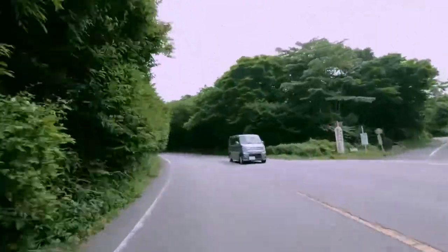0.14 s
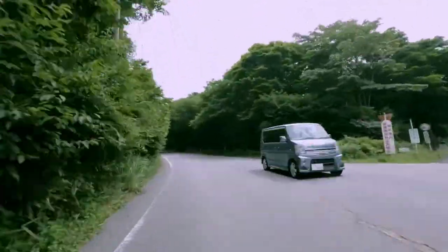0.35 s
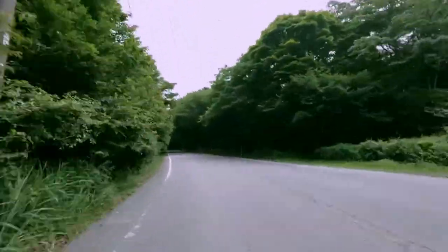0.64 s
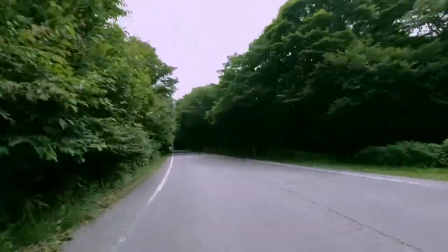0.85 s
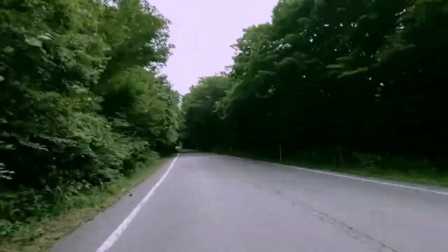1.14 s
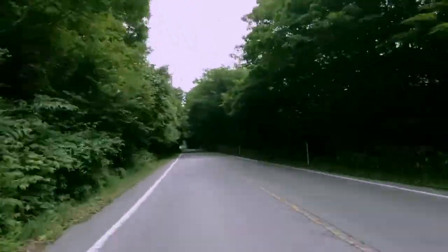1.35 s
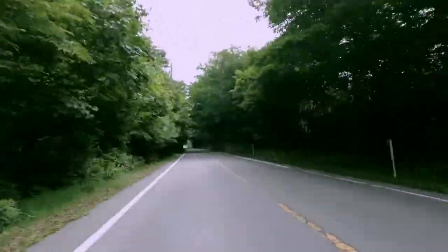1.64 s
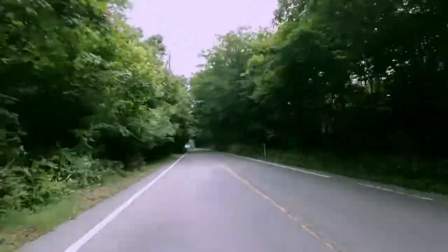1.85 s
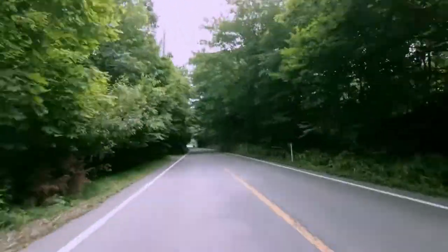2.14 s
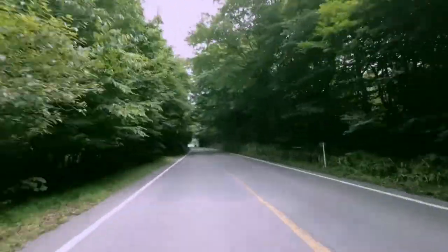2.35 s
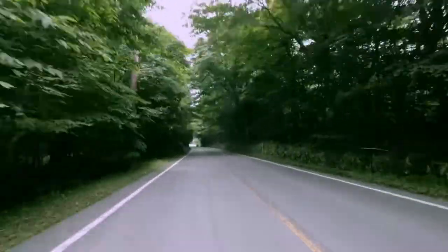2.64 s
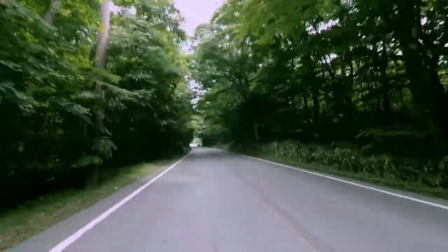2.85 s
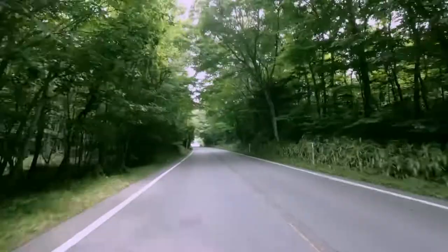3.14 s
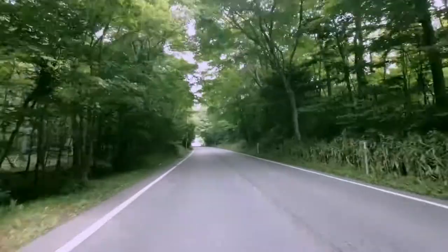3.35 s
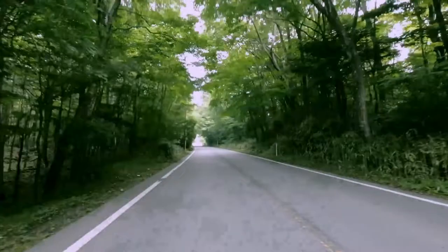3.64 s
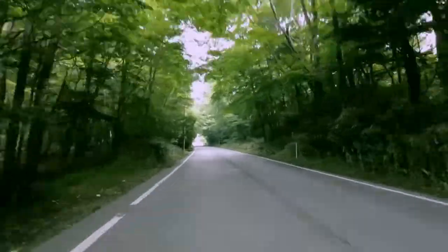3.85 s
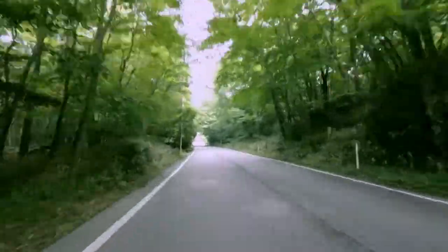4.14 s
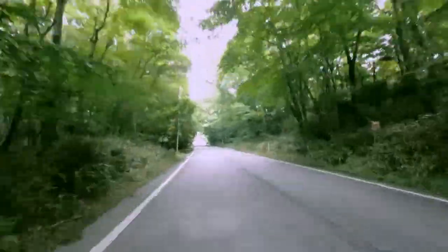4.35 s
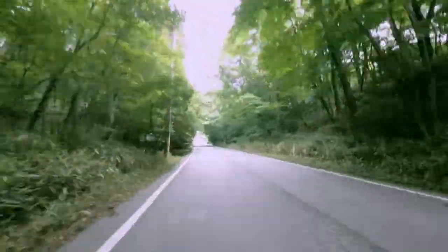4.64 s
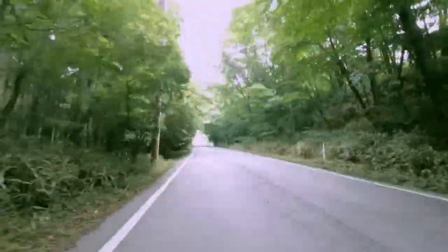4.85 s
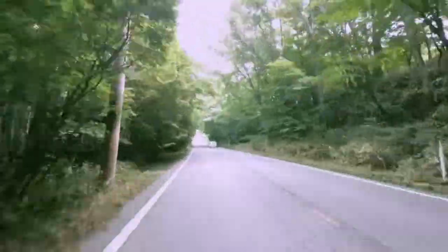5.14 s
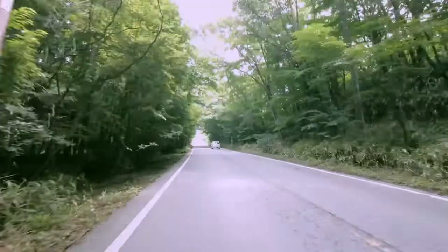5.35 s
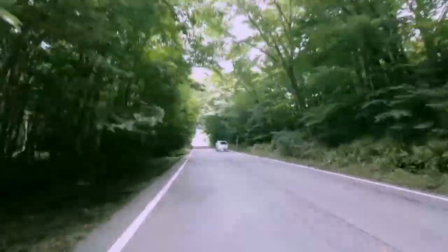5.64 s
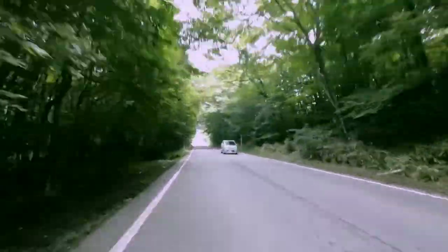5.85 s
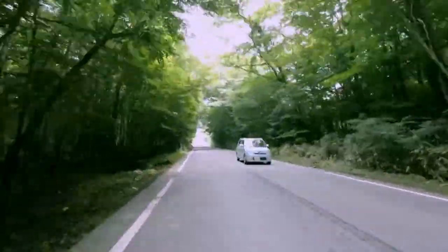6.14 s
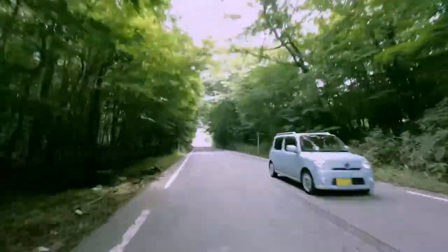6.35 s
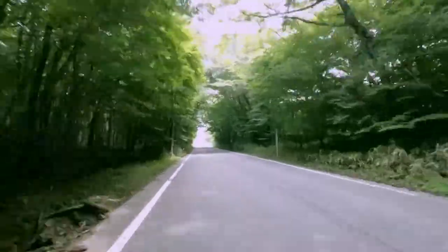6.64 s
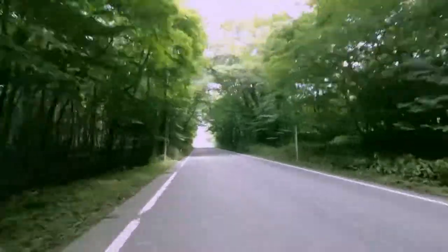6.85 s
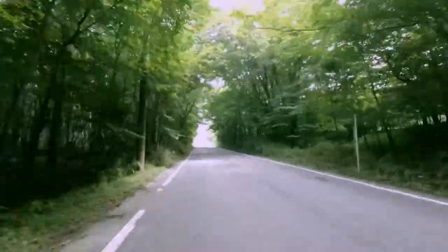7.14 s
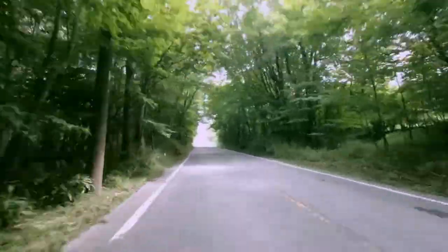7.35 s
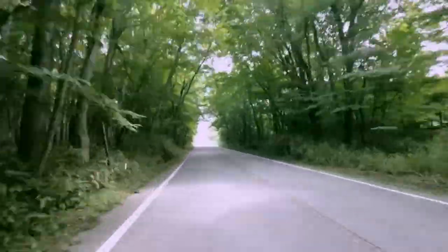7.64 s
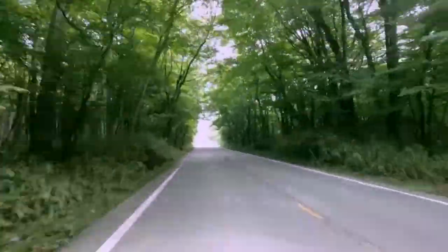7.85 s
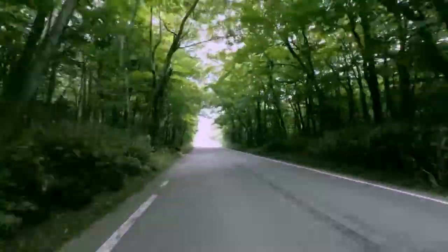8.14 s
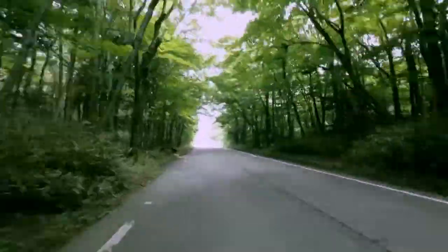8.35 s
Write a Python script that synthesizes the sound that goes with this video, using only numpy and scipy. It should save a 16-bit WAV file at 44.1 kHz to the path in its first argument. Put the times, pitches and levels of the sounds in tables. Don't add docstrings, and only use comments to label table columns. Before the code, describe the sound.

A twin-cylinder motorcycle engine throbs low and unevenly, rising slowly in pitch, with valve clatter, tyre hiss and soft wind thumps on the microphone.

```python
import sys
import numpy as np
from scipy import signal
from scipy.fft import rfft, irfft
from scipy.io import wavfile
from scipy.ndimage import uniform_filter1d

SR = 44100
rng = np.random.default_rng(int(sys.argv[2]) if len(sys.argv) > 2 else 0)


def dump(signal):
    limited = np.clip(np.atleast_2d(signal).T, -1, 1)
    pcm = np.round(limited * 32767).astype(np.int16)
    wavfile.write(sys.argv[1], SR, pcm)


def invert_db(x):
    u = np.asarray(x, float) / 20
    return 10 ** u


N = 374850

# t/s, cycle rate f/Hz
ENGINE_SPEED = [
    (0, 23.293),
    (.4, 23.508),
    (1.7, 24.559),
    (2.2, 24.755),
    (3, 25.102),
    (5, 26.005),
    (8, 26.931),
    (8.5, 27.006),
]
# t/s, opening [0-1]
THROTTLE_OPENING = [
    (0, 1),
    (.3, .95),
    (1.1, 1),
    (1.7, 0.68),
    (2.1, 0.46),
    (4, 0.3),
    (5.5, 0),
    (8.5, 0),
]
# f/Hz, width/Hz, signed strength from first cylinder [%], from second cylinder [%]
EXHAUST_MODES = [(40.25, 9.1, 4.04, .78), (53.8, 15.8, -1.4, -10.8), (78.8, 50.2, 1.14, 12.1),
                 (111.4, 21.1, -21.7, -15.8), (110.5, 49.7, 7.64, -7.72), (168.7, 23.9, -2.8, 1.97),
                 (209.6, 66, 4.55, 3.12), (230.4, 41.4, -5.45, -2.1), (291.4, 17.5, .6, .4),
                 (335.2, 29.8, .8, .3), (361.9, 22.5, .35, .95), (401.3, 29.6, -1.35, -.75),
                 (428.3, 28.4, 1., .25), (497.5, 33.6, -.49, -.05)]
# share of the cycle, level/dB into cover, head, fins, tappets
VALVE_IMPACTS = [(0.04, -13.5, -16.5, -7.5, -18.5), (0.139, -11, -21, 3, 10), (.2, -7, 1, -2, -5),
                 (0.309, 1.5, -23, 4.5, -2), (0.376, -7, -9.5, -10, 2), (.437, -6.5, 11, 9.5, 3.5),
                 (0.509, -15.5, -29, 0, 5.5), (.58, -1, 6, 5.5, 0.5), (.71, -0.5, -3, -2, -12.5),
                 (0.842, 0, -9.5, -17.5, -14.5), (.94, -2.5, -24, 4.5, -8.5)]
# f/Hz, width/Hz, level/dB
CASING_MODES = [
    [(575.4, 82, -47)],
    [(955, 57, -43), (1090, 150, -40), (1450, 760, -50.5)],
    [(1360, 120, -50.5), (1546, 76, -45.5), (1775, 36, -54.5), (2004, 130, -50.5), (2120, 110, -59),
     (2340, 100, -54), (2784, 110, -59.5)],
    [(6360, 570, -68), (7770, 470, -72), (11600, 2300, -67.5)],
]
# f/Hz, width/Hz, level/dB
PANEL_MODES = [(3333, 150, -58.5), (3526, 140, -57), (3890, 150, -75), (4410, 370, -63), (4870, 140, -63.5),
               (5380, 130, -73)]
# teeth per cycle, level/dB at the start, level/dB at the end, wobble f/Hz
GEAR_TEETH = [
    (21.08, -59.5, -45.5, 3.3),
    (22.23, -50, -56.5, 3),
    (52.4, -64, -50, 5),
    (59.27, -58, -48.5, 5),
]
# teeth per cycle, first tooth [share of the cycle], level/dB
CHAIN_SPROCKETS = [(11, .049, -38), (14, .0136, -46)]
# f/Hz, width/Hz, level/dB
COVER_MODES = [(4850, 250, 0), (5420, 300, -2)]
# f/Hz, level/dB per Hz
ROAD_SPECTRUM = [(250, -65), (400, -74), (600, -69.5), (780, -74.5), (1050, -72.5), (1500, -76),
                 (2200, -78), (2900, -88), (4100, -92.5), (5100, -100.5), (5900, -100.5), (8800, -102.5),
                 (12000, -103), (14000, -105), (16000, -103)]
# f/Hz, level/dB per Hz
WIND_SPECTRUM = [(12, -17), (25, -5.5), (45, 9), (70, -6), (130, -3.5), (220, -6), (400, -15), (800, -52.5),
                 (3000, -110)]
# t/s, level/dB, length/s
EDDIES = [(1.576, -25.5, .09), (1.774, -31.5, 0.085), (2.164, -30, .15), (2.333, -26, 0.082),
          (2.551, -20.5, 0.053), (2.728, -34, .14), (3.246, -30, 0.06), (3.848, -23, .1),
          (4.484, -23.5, 0.095), (5.028, -24, 0.14), (5.729, -32, 0.11), (6.234, -25.5, .14),
          (6.384, -21, 0.04), (6.605, -24.5, 0.1), (6.785, -20, .06), (6.881, -25, 0.1),
          (7.014, -18.5, .075), (7.26, -29, 0.069), (7.39, -19, 0.14), (7.746, -23, 0.047),
          (8.095, -30, .06), (8.232, -28, .18)]
DROPOUTS = [.033, .332, .697, 1.080, 1.207, 1.570, 1.656, 1.847, 3.106, 3.234, 3.363, 3.789, 4.108, 4.258,
            4.407, 4.450, 4.684, 5.192, 5.384, 5.751, 6.072, 6.242, 6.519, 6.647, 7.692, 8.227]
DROPOUTS_TWICE = [.823, 1.443, 2.765]

EXHAUST_DB = (0.25, 1.5, 0.76)
BOOM_DB = (-1, 2.22, -0.12)
BARK_DB = (-2, 8.5, 1.74)
RASP_DB = (0.83, 0.5, 1)
KNOCK_DB = (-4, 4.5, 0)
UNEVEN_DB = (-0.03, 0.65, -0.04)
ROAD_LEVEL_DB = (-36, 2.1, 0.7)
CHAIN_PULL_DB = (-1.1, 9.5, 2.3)
CRUISE_HZ = 25.5

TIME = np.arange(N) / SR
WARM_UP = SR // 2
START_CYCLE = -.091
FIRING = (.2081, .5882)
FIRING_JITTER_S, PIPE_LEAD_S = .0001, .005
PULSE_S, SPLASH_S = .0012, .003
TICK_SCATTER_DB = (1.5, 1.5, 1.8, 3.)
TICK_JITTER_S = (.00006, .00006, .00003, .0004)
KNOCK_SHARE = (0, 1, 0.35, 0)


def curve(table):
    s, *columns = np.transpose(table)
    return [np.interp(TIME, s, c) for c in columns]


def follow(rule, throttle, hz):
    cruise_db, throttle_db, speed_db = rule
    return cruise_db + throttle_db * throttle + speed_db * (hz - CRUISE_HZ)


def unit(x):
    return x / np.sqrt(np.mean(x ** 2))


def ring(x, hz, width):
    return signal.lfilter(*signal.iirpeak(hz, hz / width, fs=SR), x)


def mode(x, hz, first_width, width):
    return unit(ring(ring(x, hz, first_width), hz, width))


def smear(x, length):
    bump = np.hanning(int(length * SR) + 3)
    return signal.oaconvolve(x, bump / bump.sum(), "same")


def noise(spectrum):
    hz, db = np.transpose(spectrum)
    bins = np.arange(N // 2 + 1) * SR / N + 1
    gain = invert_db(np.interp(np.log(bins), np.log(hz), db, -200))
    return unit(irfft(rfft(rng.standard_normal(N)) * gain, N))


def walk(rate):
    k = int(SR / rate)
    held = np.repeat(rng.standard_normal(N // k + 1), k)
    return unit(uniform_filter1d(uniform_filter1d(held, k), k)[:N])


def strikes(cycle, share, scatter_db, jitter_s):
    n = len(cycle)
    whole = np.arange(int(cycle[0]) + 1, int(cycle[-1]) + 1)
    chance = rng.standard_normal((len(whole), 2))
    place = np.interp(whole + share, cycle, np.arange(n), right=np.inf)
    place = np.clip(place + jitter_s * SR * chance[:, 0], 0, n)
    first, part = place.astype(int), place % 1
    size = invert_db(chance[:, 1] * (scatter_db + np.zeros(n + 1))[first])
    early = np.bincount(first, size * (1 - part), n + 2)
    late = np.bincount(first + 1, size * part, n + 2)
    return (early + late)[:n]


def wind():
    out = invert_db(-36 + 2.2 * walk(20)) * noise(WIND_SPECTRUM)
    chance = rng.standard_normal((len(EDDIES), SR // 2))
    for (s, db, length), row in zip(EDDIES, chance):
        swell = np.hanning(int(length * SR))
        hz = 92 * np.exp(0.12 * row[0])
        eddy = ring(ring(row, hz, 1.1 * hz), hz, 1.1 * hz)[-len(swell):]
        first = int(s * SR) - len(swell) // 2
        out[first:first + len(swell)] += invert_db(db - 3) * unit(swell * eddy)
    return out


def road(level_db):
    return invert_db(level_db + 0.58 * walk(14)) * noise(ROAD_SPECTRUM)


def shaking(cycle):
    shaken = (cycle % 1 > 0.41) & (cycle % 1 < 0.74)
    return invert_db(np.where(shaken, 0, -7) + 1.5 * walk(60))


def rattle(force):
    return sum(invert_db(db) * mode(force * rng.standard_normal(N), f, 2 * w, w) for f, w, db in PANEL_MODES)


def whine(cycle, force):
    slots_per_cycle, flutter_hz = 202.5, 260
    tone = force * walk(flutter_hz) * np.sin(2 * np.pi * slots_per_cycle * cycle)
    return invert_db(-57) * sum(invert_db(db) * ring(tone, f, w) for f, w, db in COVER_MODES)


def gears(cycle):
    out = np.zeros(N)
    for teeth, first_db, last_db, wobble_hz in GEAR_TEETH:
        level = invert_db(np.linspace(first_db, last_db, N) + 3.5)
        wobble_rad = .5 * walk(wobble_hz)
        out += level * np.sin(2 * np.pi * teeth * cycle + wobble_rad)
    return out


def chain(cycle):
    return sum(invert_db(db) * np.sin(2 * np.pi * teeth * (cycle - share)) for teeth, share, db in CHAIN_SPROCKETS)


def valves(cycle, knock_db):
    out = np.zeros(N)
    for k, modes in enumerate(CASING_MODES):
        hits = sum(invert_db(row[k + 1]) * strikes(cycle, row[0], TICK_SCATTER_DB[k], TICK_JITTER_S[k])
                   for row in VALVE_IMPACTS)
        if k == 3:
            hits = smear(hits, SPLASH_S) * rng.standard_normal(N)
        part = np.zeros(N)
        for m, (f, w, db) in enumerate(modes):
            part += (-1) ** m * invert_db(db) * mode(hits, f, 8.4 * w, w)
        out += part * invert_db(knock_db * KNOCK_SHARE[k])
    return out


def exhaust(cycle, hz, load_db, tone_db, uneven_db):
    ahead = cycle + PIPE_LEAD_S * hz
    uneven_db = np.pad(uneven_db, (WARM_UP, 1), "edge")
    one, two = (smear(strikes(ahead, share, uneven_db, FIRING_JITTER_S), PULSE_S) for share in FIRING)
    boom, bark, rasp = invert_db(np.array(tone_db))
    out = np.zeros(N)
    for f, w, a, b in EXHAUST_MODES:
        tone = boom if f < 95 else 1 if f < 190 else bark if f < 310 else rasp
        out += tone * ring(a * one + b * two, f, w)[WARM_UP:]
    return SR / 5000 * invert_db(load_db) * out


def scene():
    hz = np.pad(curve(ENGINE_SPEED)[0], (WARM_UP, 0), "edge")
    cycle = START_CYCLE + (np.cumsum(hz) - WARM_UP * hz[0]) / SR
    heard, heard_hz = cycle[WARM_UP:], hz[WARM_UP:]
    throttle = curve(THROTTLE_OPENING)[0]

    def level(rule):
        return follow(rule, throttle, heard_hz)

    tone_db = [level(BOOM_DB), level(BARK_DB), level(RASP_DB)]
    force = shaking(heard)
    casing = valves(heard, level(KNOCK_DB)) + rattle(force) + gears(heard)
    casing += invert_db(level(CHAIN_PULL_DB)) * chain(heard) + whine(heard, force)
    pipe = exhaust(cycle, hz, level(EXHAUST_DB), tone_db, level(UNEVEN_DB))
    return (pipe + casing + road(level(ROAD_LEVEL_DB)) + wind())[None]


def drop_treble(x):
    relapses = np.add(DROPOUTS_TWICE, .064)
    times = np.concatenate([DROPOUTS, DROPOUTS_TWICE, relapses])
    marks = np.bincount((times * SR).astype(int), minlength=N)
    lost = signal.oaconvolve(marks, np.hanning(int(.028 * SR)), "same")
    bins = np.arange(N // 2 + 1) * SR / N
    bands_hz = [(2950, 3250), (3800, 4650), (5300, 18000)]
    weak = sum((bins > lo) & (bins < hi) for lo, hi in bands_hz)
    return x - np.clip(lost, 0, 1) * irfft(rfft(x) * weak, N)


def low_pass(x):
    return signal.sosfilt(signal.butter(12, 15830, fs=SR, output="sos"), x)


def record(dry):
    overload = 1.0
    rounded = overload * np.tanh(dry / overload)
    mix = drop_treble(rounded)
    return low_pass(mix)


dry = scene()
out = record(dry)
dump(out)
```